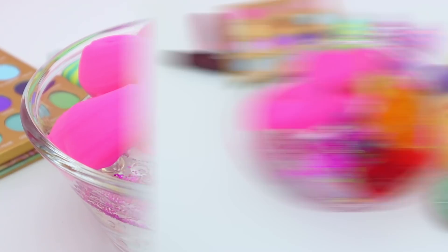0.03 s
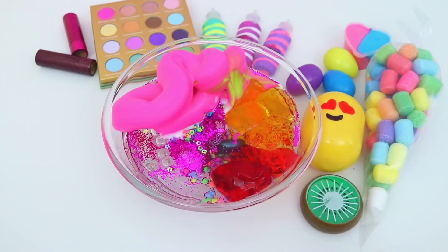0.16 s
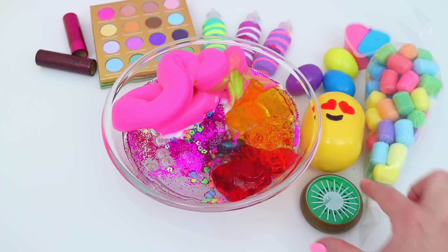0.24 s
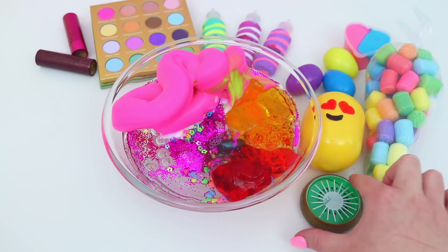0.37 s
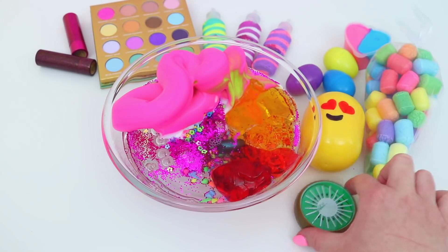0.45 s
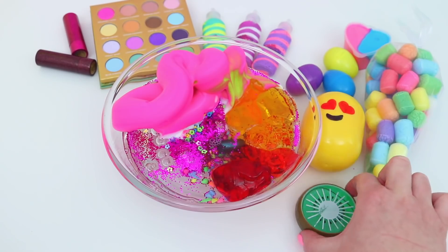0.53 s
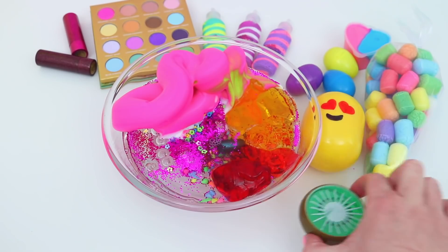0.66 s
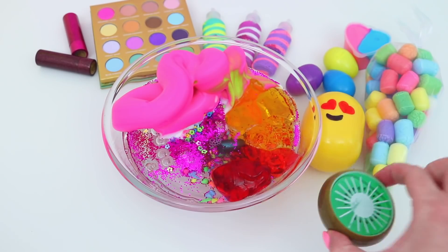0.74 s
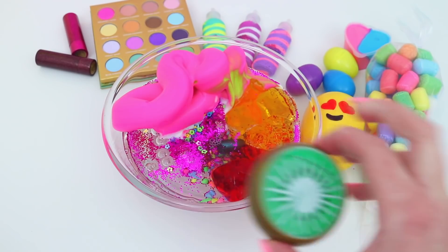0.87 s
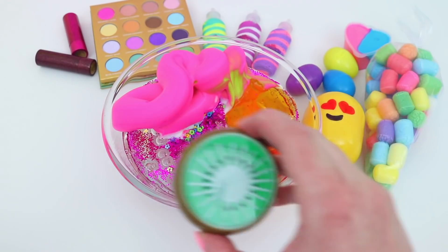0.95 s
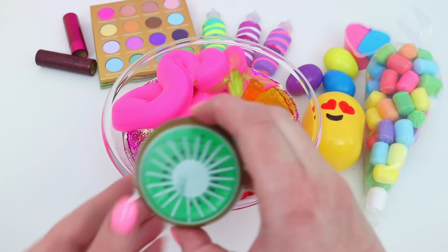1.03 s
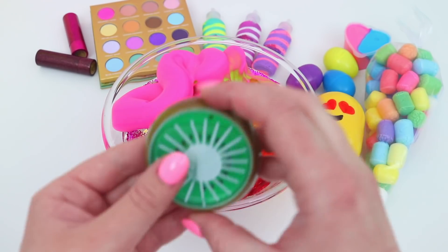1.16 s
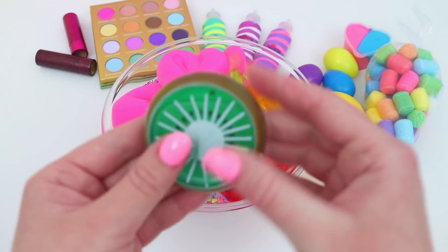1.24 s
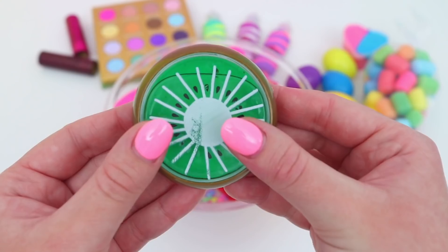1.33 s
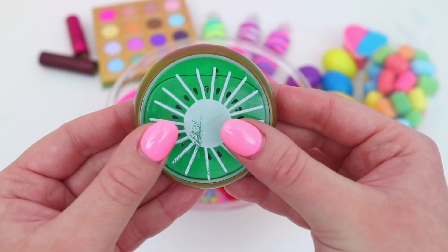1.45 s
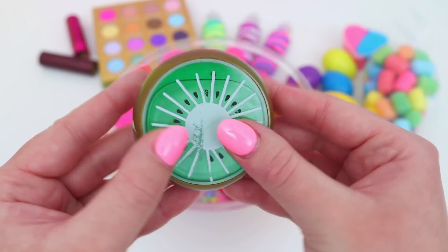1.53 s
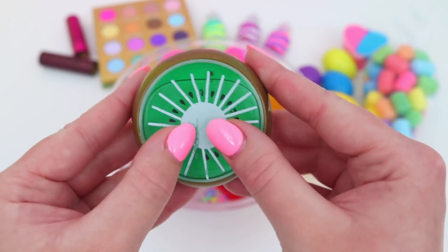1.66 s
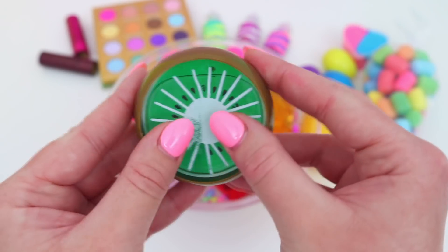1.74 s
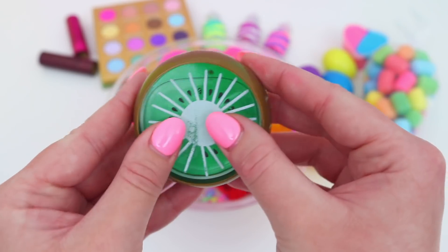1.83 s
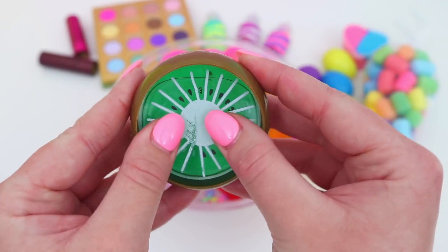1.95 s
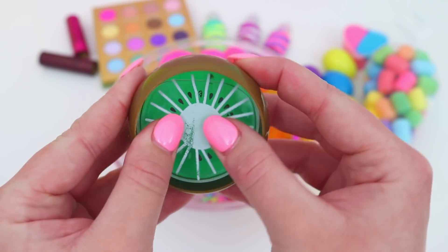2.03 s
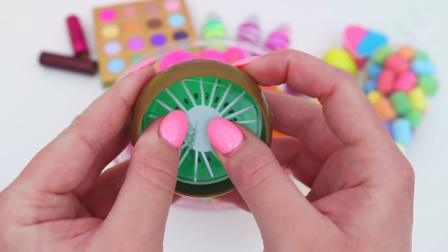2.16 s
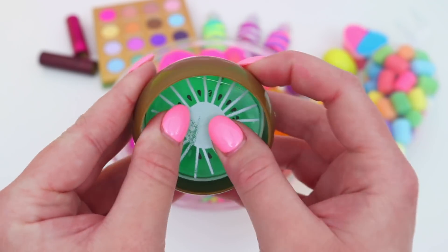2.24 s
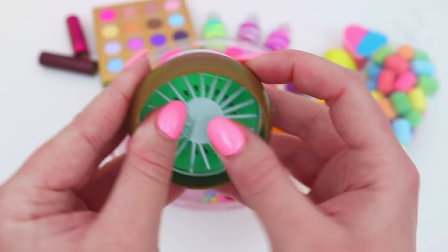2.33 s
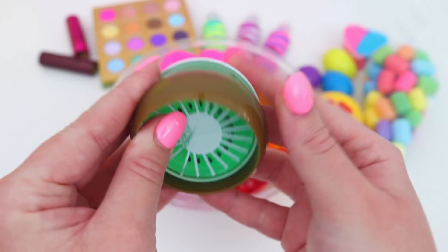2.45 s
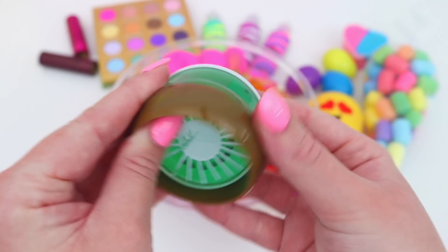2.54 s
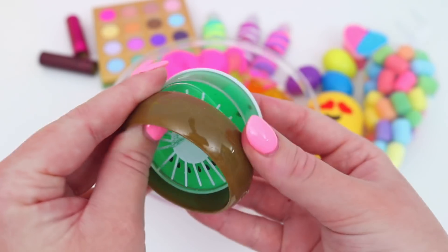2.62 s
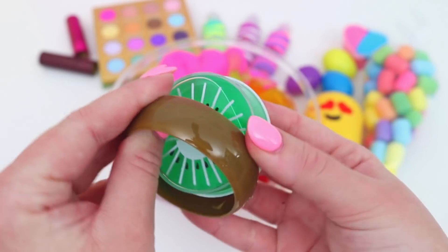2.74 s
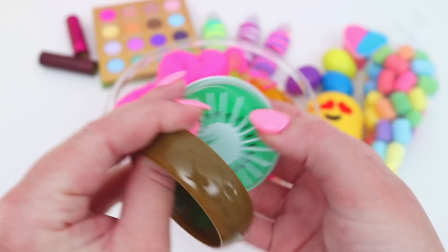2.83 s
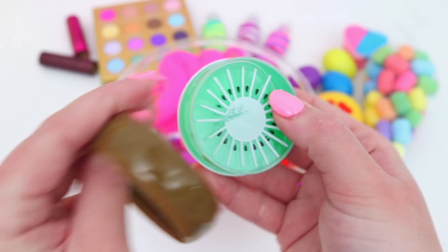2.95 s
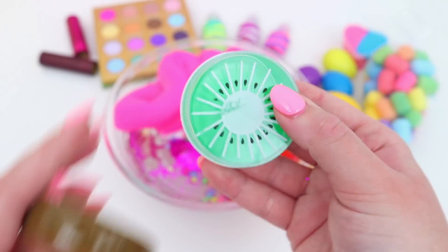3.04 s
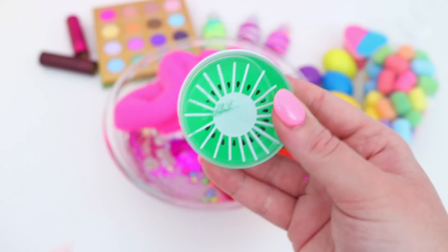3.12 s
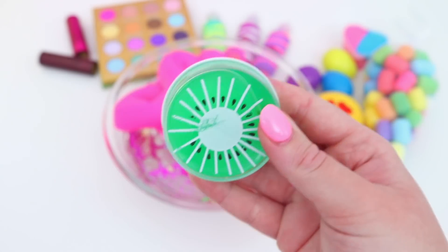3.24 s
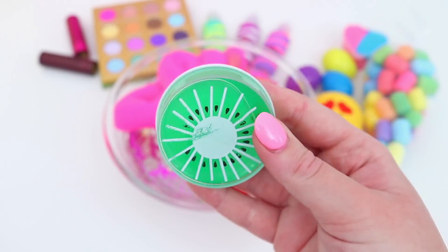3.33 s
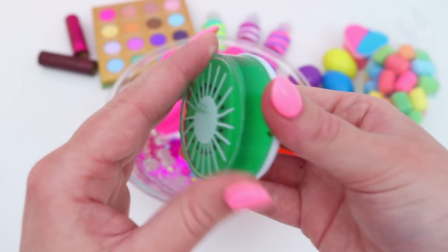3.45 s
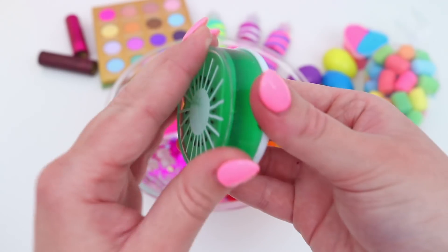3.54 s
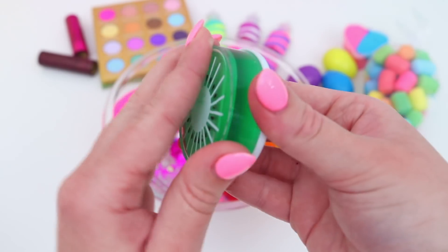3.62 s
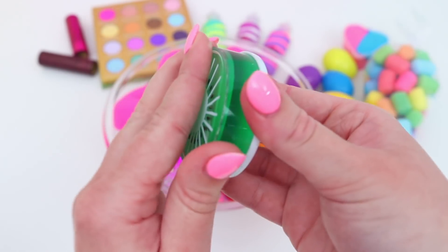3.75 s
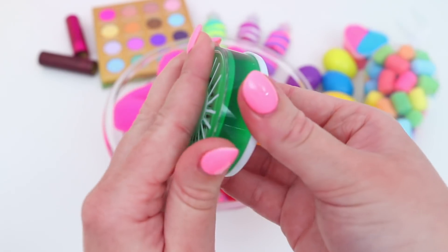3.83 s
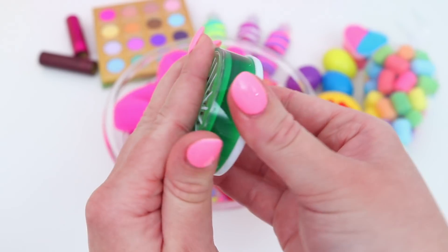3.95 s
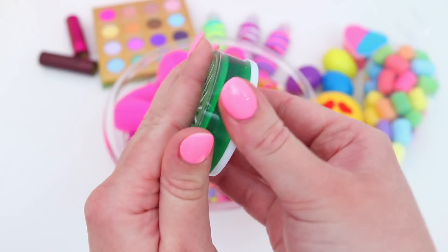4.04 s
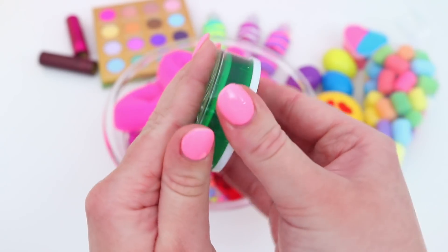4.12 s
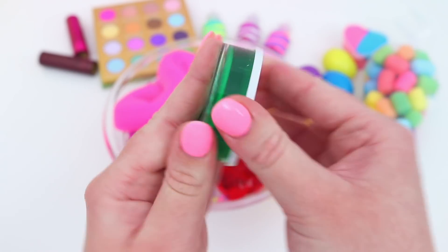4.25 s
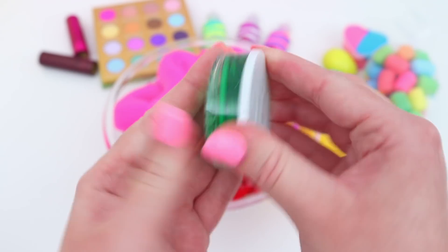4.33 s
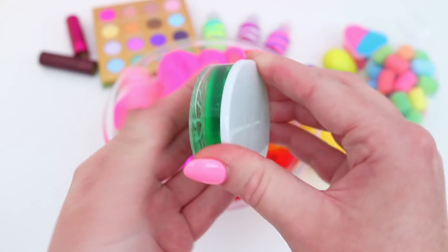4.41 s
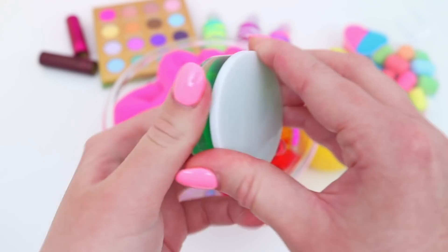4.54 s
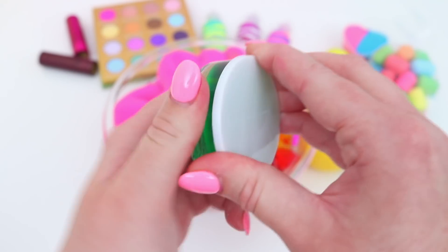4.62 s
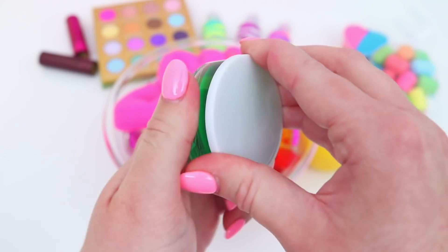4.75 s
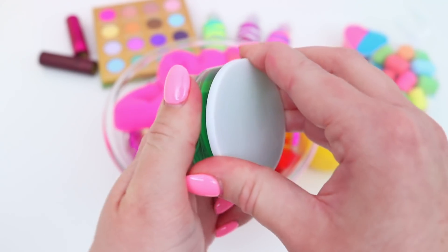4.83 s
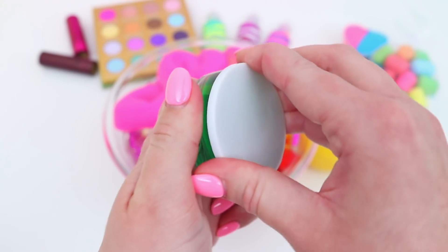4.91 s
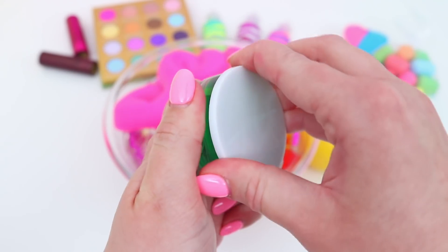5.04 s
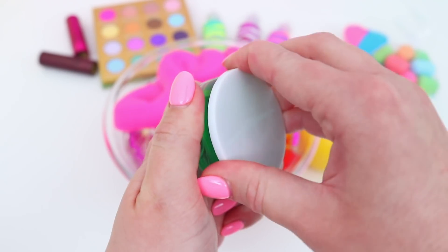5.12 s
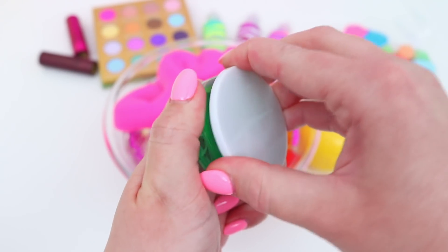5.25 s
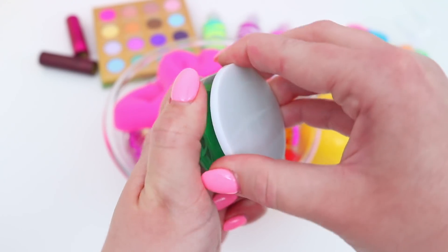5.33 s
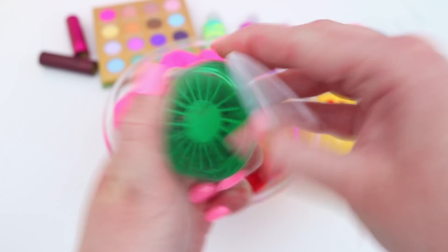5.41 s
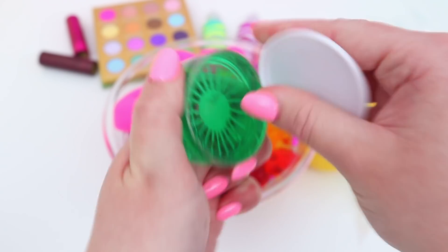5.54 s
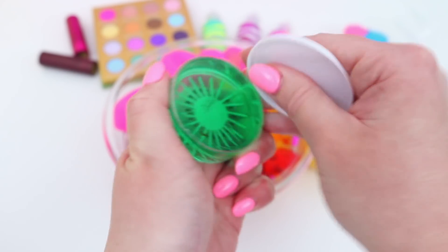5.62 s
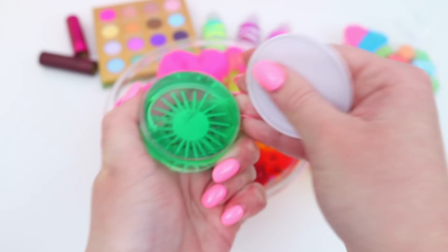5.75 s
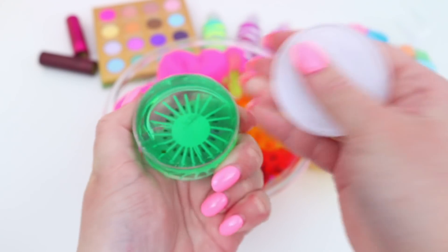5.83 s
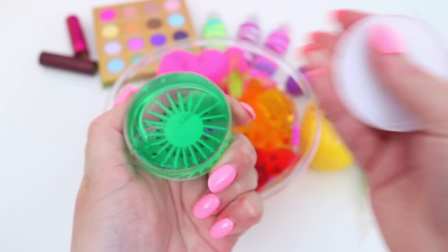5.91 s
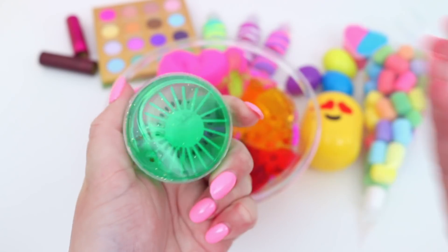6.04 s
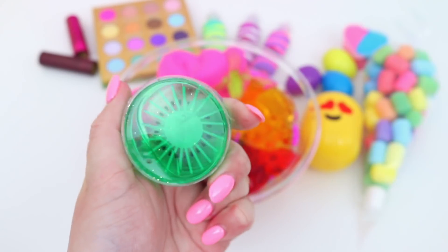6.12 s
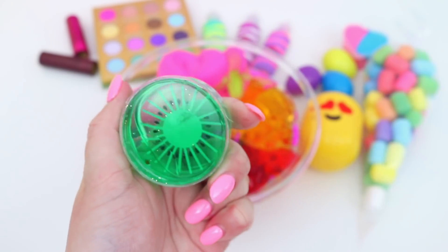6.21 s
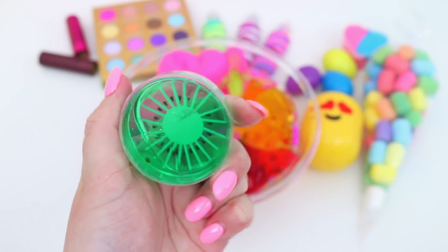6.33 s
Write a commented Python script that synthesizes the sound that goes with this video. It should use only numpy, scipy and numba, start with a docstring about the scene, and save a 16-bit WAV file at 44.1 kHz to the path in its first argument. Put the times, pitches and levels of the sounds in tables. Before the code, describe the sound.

In a quiet room a little plastic container is dragged, squeezed and clicked out of its shell, gently rubbed, then popped open with one sharp crack.

```python
"""A table in a quiet room, with the microphone close: a small plastic tub is dragged off it, pushed out of
its outer shell and turned in the hands until its lid snaps off.
Clicks and stick-slip scrapes ring shell, cavity and thin walls, and at last shake the freed lid.
Gritty slips make the table rattle, the skin rustle and the creaks; filtered noise and tones make the room."""
import sys
import numpy as np
from scipy import signal
from scipy.fft import rfft, irfft
from scipy.io import wavfile
from scipy.ndimage import uniform_filter1d
from numba import njit

SR = 44100
rng = np.random.default_rng(int(sys.argv[2]) if len(sys.argv) > 2 else 0)


def materialize(psi):
    """Save the field psi as 16-bit PCM at rate SR to the path in sys.argv[1].

    A 1-D psi becomes a single channel; in a 2-D psi each row is a channel.
    """
    bounded = np.clip(np.atleast_2d(psi).T, -1, 1)
    quanta = np.round(bounded * 32767).astype(np.int16)
    wavfile.write(sys.argv[1], SR, quanta)


N = 281088
T = np.arange(N) / SR

# clicks of nails and rims: start [t/s], crack drive [level/dB], hollow ring drive [level/dB], crack centre [f/Hz]
CLICKS = [(1.041, -50, -63, 4000), (1.183, -36, -63, 6840), (1.1934, -47, -47.5, 2540),
          (1.5905, -43.5, -58, 7940), (1.6417, -40.5, -50.5, 3900), (1.759, -43, -51, 4100),
          (1.7781, -24.5, -64, 3260), (1.817, -7.5, -32, 5700), (1.8302, -32, -52, 3180),
          (1.938, -31.5, -43, 7100), (2.0164, -47.5, -48, 2220), (2.05, -37.5, -66, 8260),
          (2.0577, -61, -45, 2200), (2.077, -50.5, -37, 4730), (2.0911, -67, -42.5, 2350),
          (2.104, -55, -38.5, 2470), (2.136, -64, -39, 2230), (2.169, -46, -65, 4600),
          (2.1763, -40, -48, 4710), (2.1819, -29.5, -26, 2030), (2.1974, -38, -32, 2420),
          (2.2106, -19.5, -23.5, 2060), (2.22, -39.5, -36, 2440), (2.2474, -57, -40, 2710),
          (2.2892, -45, -34.5, 2300), (2.315, -35, -46.5, 3200), (2.396, -30.5, -44, 5100),
          (2.4905, -9, -36.5, 10840), (2.5277, -45, -46, 4650), (2.567, -36, -41, 3540),
          (2.5934, -33.5, -37.5, 4800), (2.6056, -34, -34, 3250), (2.6453, -34, -44, 5000),
          (2.663, -39, -40, 2620), (2.7094, -35, -34, 2650), (2.818, -53, -27.5, 2210),
          (2.866, -37.5, -29.5, 3410), (2.9179, -21, -31, 4100), (2.9654, -61, -44.5, 2600),
          (3.4846, -61, -55.5, 2590), (4.0663, -50.5, -54, 3760), (4.123, -47, -48.5, 3080),
          (4.14, -41, -47, 3060), (4.152, -41.5, -46.5, 3030), (5.5003, -39.5, -16, 4000),
          (5.513, 7, -39, 4240), (5.549, -18, -24, 2503), (5.5711, -14.5, -30.5, 4230),
          (5.6406, -28, -21, 2550), (5.655, -22, -40, 7000), (5.6695, -40, -34, 2600),
          (5.681, -28, -40, 4000), (6.0106, -69, -49.5, 2724), (6.0855, -54, -41.5, 2690)]
# stick-slip scrapes of rim on rim:
# start [t/s], length [t/ms], hollow ring drive [level/dB], rasp drive [level/dB], rasp centre [f/Hz]
SCRAPES = [(1.63, 28, -78, -58, 5250), (1.771, 12.4, -41.5, -35, 4100), (1.783, 31, -58.5, -49.5, 5530),
           (1.813, 6.4, -42.5, -28.5, 6900), (1.895, 33, -64, -49, 8600), (1.924, 25, -71, -50, 8400),
           (1.949, 28, -48, -46.5, 6800), (2.292, 36, -49, -55, 2680), (2.386, 37.5, -57.5, -47.5, 5760),
           (2.573, 15, -49, -42.5, 5300), (2.609, 26.5, -45, -39, 4750), (2.628, 53, -57.5, -52, 4000),
           (2.715, 21.7, -43.5, -34, 6360), (2.734, 28, -50.5, -47.5, 3860), (2.869, 7.1, -37, -35.5, 5360),
           (2.918, 19.6, -47.5, -49, 3980), (2.955, 25, -47, -52, 5260), (2.985, 21, -55, -52, 6500),
           (5.437, 16.7, -25.5, -28, 4400), (5.454, 13.3, -29, -35, 4320), (5.462, 14, -33, -26.5, 6500),
           (5.474, 15.6, -36.5, -32.5, 3500), (5.4919, 10, -34, -11, 6000), (5.501, 11.6, -30.5, -26, 4000),
           (5.5129, 8, -24, -7.5, 2370), (5.524, 47, -37.5, -39, 3232)]
# modes of the outer shell: pitch [f/Hz], relative level [level/dB], 60 dB decay [t/s]
SHELL = [(647, 4, 0.015), (433, -11, 0.018), (1710, -2, 0.014), (910, -0.5, 0.01)]
# modes of the tub's hollow: pitch [f/Hz], relative level [level/dB], 60 dB decay [t/s]
CAVITY = [(1443.5, -1, 0.025), (2634, -25, 0.032)]


def undb(db):
    """Decibels to linear gain."""
    return 10 ** (np.asarray(db) / 20)


def unit(x):
    """Scale to rms 1."""
    return x / np.sqrt(np.mean(x ** 2))


@njit
def svf(x, hz, k):
    """State-variable band-pass whose centre may move; k = width / centre."""
    y, b, l = np.empty(len(x)), 0., 0.
    for i in range(len(x)):
        g = np.tan(np.pi * hz[i] / SR)
        v = (b + g * (x[i] - l)) / (1 + g * (g + k))
        b, l, y[i] = 2 * v - b, l + 2 * g * v, k * v
    return y


def band(x, hz, width_hz):
    """Band-pass with a fixed centre."""
    return svf(x, np.full(N, 1. * hz), width_hz / hz)


def ring(modes, stretch=1, spread_db=0):
    """Response of decaying modes to one tap."""
    t = T[:SR // 5]
    spread_db = spread_db + np.zeros(len(modes))
    out = np.zeros(len(t))
    for (hz, db, t60_s), more_db in zip(modes, spread_db):
        out += undb(db + more_db - 60 * t / t60_s) * np.sin(2 * np.pi * hz * stretch * t)
    return out


def shiver(hz, width_hz, t60_s):
    """Response of very many close modes: noise that dies away; energy 1."""
    tail = band(rng.standard_normal(N), hz, width_hz) * undb(-60 * T / t60_s)
    tail = tail[:SR // 2]
    return tail / np.linalg.norm(tail)


def grit(scatter_db, smear_s):
    """Dense slips of very uneven size; rms 1."""
    smooth = uniform_filter1d(rng.exponential(size=N), int(smear_s * SR) + 1)
    size = undb(scatter_db * smooth * np.sqrt(smear_s * SR))  # the root undoes the loss of scatter in smoothing
    size = np.minimum(size / np.median(size), 30)
    return unit(size * rng.standard_normal(N))


def swells(rows, power):
    """Gain of (start [t/s], length [t/s], level [dB]) gestures that each rise and fall."""
    gain = np.zeros(N)
    for s, length_s, db in np.atleast_2d(rows):
        arch = np.sin(np.pi * np.clip((T - s) / length_s, 0, 1))
        gain += undb(db) * np.maximum(arch, 0) ** power
    return gain


def walls(x, ring_db):
    """Thin walls add their resonances to a broad sound."""
    # wall resonances: centre [f/Hz], width [f/Hz], relative level [level/dB]
    wall_modes = [(2336, 500, 3), (3000, 200, -12), (3630, 170, -1.5), (4795, 67, -11.5), (5780, 590, -4),
                  (7450, 53, -15.5), (7990, 230, 2), (10800, 110, -1), (13400, 280, -5), (13800, 580, -2)]
    resonances = np.zeros(N)
    for k, (hz, width_hz, db) in enumerate(wall_modes):
        resonances += (-1) ** k * undb(db) * band(x, hz, width_hz)  # neighbours alternate in sign
    return x + undb(ring_db) * resonances


def air():
    """Microphone hiss, low room rumble and a few wavering appliance tones."""
    # spectrum of hiss and rumble: [f/Hz], relative density [level/dB per Hz]
    hiss_curve = [(15, -45), (25, -19.5), (70, -0.5), (97, -5.5), (127, -3.5), (217, -10.5), (249, -8),
                  (384, -16.5), (427, -17.5), (489, -16.5), (1520, -24), (3620, -26.5), (16000, -29)]
    # appliance tones: pitch [f/Hz], level of the steady tone [level/dB rms]
    tone_rows = [(70.0, -72.5), (209.9, -77.5), (317.6, -85.5), (387.6, -76.5)]
    f = np.fft.rfftfreq(N, 1 / SR) + 1  # 1 Hz up, to keep the logarithm finite
    hz, db = np.transpose(hiss_curve)
    colour = undb(np.interp(np.log(f), np.log(hz), db))
    hiss = unit(irfft(rfft(rng.standard_normal(N)) * colour, N))
    tones = np.zeros(N)
    for hz, db in tone_rows:
        steady = np.sqrt(2) * np.sin(2 * np.pi * hz * T)
        waver = .5 * unit(band(rng.standard_normal(N), hz, 11))
        tones += undb(db) * (steady + waver)
    return undb(-66.5) * hiss + tones


def room(x, wet_db, t60_s):
    """Diffuse echoes, dull because the treble is soaked up."""
    echoes = signal.fftconvolve(x, shiver(1500, 3000, t60_s))[:N]
    return undb(wet_db) * np.roll(echoes, int(0.0055 * SR))  # echoes start 5.5 ms late


def table():
    """The table top rattles under the dragged tub; dull thuds come from it and later from the hands' jerks."""
    # resonances of the table top: centre [f/Hz], width before widening [f/Hz], relative level [level/dB]
    top_modes = [(321, 61, 22.5), (438, 63, 27), (854, 267, 20), (1320, 460, 10)]
    # thuds of the tub on the table, later of the hands' jerks: start [t/s], drive [level/dB], pitch [f/Hz]
    thuds = [(0.147, -41.5, 205), (0.503, -33.5, 400), (0.51, -39, 400), (0.577, -27, 440),
             (0.61, -34, 393), (0.643, -35, 427), (5.113, -44.5, 109), (5.443, -32, 118),
             (5.512, -26.5, 95.7), (5.516, -23, 220)]
    jolt_s, rise_s, lift_s = .528, 0.0082, 0.665  # the tub jerks loose, slides and leaves the table
    jolt_db, jolt_db_per_s = -35.5, 702
    slide_db, slide_db_per_s = -45.5, 60
    sand_db, sand_db_per_s, lift_db_per_s = -42, 295, 250

    slips = grit(scatter_db=2.5, smear_s=0.00075)
    top = np.zeros(N)
    for hz, width_hz, db in top_modes:
        wide_hz = 1.9 * width_hz  # each of the two passes is wider
        top += undb(db) * band(band(slips, hz, wide_hz), hz, wide_hz)
    top = unit(top)
    sand = unit(band(band(slips, 2100, 3000), 2100, 3000))

    after_s = np.maximum(T - jolt_s, 0)
    onset = np.exp(-(np.minimum(T - jolt_s, 0) / rise_s) ** 2)
    touch = onset * undb(-lift_db_per_s * np.maximum(T - lift_s, 0))
    rattle = undb(jolt_db - jolt_db_per_s * after_s) + undb(slide_db - slide_db_per_s * after_s)
    out = touch * (rattle * top + undb(sand_db - sand_db_per_s * after_s) * sand)
    for s, db, hz in thuds:
        # a soft contact, about a cycle long
        thud = ring([(hz, db, 9 / hz)]) * (1 - np.exp(-T[:SR // 5] * hz * 3.6))
        i = int(s * SR)
        out[i:i + len(thud)] += thud
    return signal.sosfilt(signal.butter(2, 70, "highpass", fs=SR, output="sos"), out)


def fingers():
    """Skin scuffs over the walls in patches and makes the cavity hum faintly; the hands rumble."""
    # strokes over the plastic: start [t/s], length [t/s], rustle [level/dB], bright minus low rustle [level/dB]
    strokes = [(1.048, 0.13, -73.5, -27), (1.355, 0.22, -75.5, -1), (1.584, 0.068, -68, 0),
               (1.679, 0.093, -68.5, -1.5), (3.021, 0.12, -67.5, 6), (3.137, 0.11, -67.5, 1.5),
               (3.232, 0.086, -68, -35), (3.323, 0.046, -63, -1.5), (3.368, 0.077, -68.5, -20),
               (4.09, 0.08, -72, -4), (4.157, 0.091, -66, 0), (4.326, 0.11, -76.5, 7.5),
               (4.7, 0.29, -79, -2), (5.784, 0.068, -70.5, -4), (5.865, 0.071, -70.5, -8),
               (6.091, 0.32, -76, -6.5)]
    # hums of the cavity as skin drags on its rim: start [t/s], length [t/s], [level/dB]
    hums = [(1.2, .07, -73), (1.6, 0.045, -71), (3.46, 0.054, -69.5), (4.33, 0.14, -70.5),
            (4.55, 0.026, -72), (4.68, 0.065, -73), (4.79, 0.069, -68), (4.9, 0.1, -74),
            (5.02, 0.053, -74.5), (5.23, 0.14, -76), (5.8, 0.051, -70), (6.0, 0.041, -68),
            (6.09, 0.049, -68)]
    # rumble while the hands work near the microphone: start [t/s], length [t/s], [level/dB]
    hands = (1.4, 2.2, -64)
    patches = [undb(2.5 * unit(band(rng.standard_normal(N), 16, 32))) for _ in range(3)]
    slips = [unit(p * grit(scatter_db=1.0, smear_s=0.0011)) for p in patches]

    low = unit(walls(band(slips[0], 1700, 6900), ring_db=4.0))
    high = unit(walls(band(band(slips[1], 9700, 9800), 9700, 9800), ring_db=0.5))
    hum = unit(band(slips[2], CAVITY[0][0], 45) + 0.28 * band(slips[2], CAVITY[1][0], 150))
    rumble = unit(band(band(rng.standard_normal(N), 71, 150), 71, 150))

    low_rows = [(s, length_s, db) for s, length_s, db, _ in strokes]
    high_rows = [(s, length_s, db + more_db) for s, length_s, db, more_db in strokes]
    rustle = swells(low_rows, power=0.2) * low + swells(high_rows, power=0.22) * high
    return rustle + swells(hums, power=0.47) * hum + swells(hands, power=0.47) * rumble


def creak():
    """Thumb pushes make dense tiny slips between tub and shell."""
    # thumb pushes: start [t/s], length [t/s], [level/dB]
    pushes = [(1.75, 0.34, -66.5), (2.0, 0.39, -62.5), (2.5, 0.56, -61.5), (3.03, 0.58, -69)]
    slips = grit(scatter_db=3.0, smear_s=.001)
    shell = signal.fftconvolve(slips, ring(SHELL))[:N]
    groan = unit(band(shell, 1200, 1600))
    fizz = unit(band(slips, 3400, 12000))
    return swells(pushes, power=0.7) * unit(groan + 0.84 * fizz)


def hollow(s, db):
    """Levels of shell and cavity for a contact at time s: the grip damps one of the two."""
    # which hollow part rings, as thumbs damp the tub or the shell: [t/s], cavity minus shell [level/dB]
    grip_lean = [(1.2, 33), (1.68, 15), (1.75, -0.5), (1.94, -11), (2.14, -22), (2.33, -5), (2.38, 13),
                 (2.6, 9), (2.606, -2.5), (2.64, 3), (2.71, 9), (2.73, -5), (2.81, 14), (2.88, 12),
                 (2.92, 28), (2.96, 4), (4.13, 0.5), (5.44, 18), (5.47, 6), (5.5, 11.5), (5.53, 8.5),
                 (5.64, 14.5), (6.1, 9)]
    lean_db = np.interp(s, *np.transpose(grip_lean))
    return db - max(lean_db, 0), db + min(lean_db, 0)


def scrapes():
    """Stick-slip bursts ring shell and cavity and rasp; returns (hollow ring, rasp)."""
    shell, cavity, rasp = np.zeros(N), np.zeros(N), np.zeros(N)
    h_shell, h_cavity = ring(SHELL), ring(CAVITY)
    slips = grit(scatter_db=-1.5, smear_s=0.00013)
    for s, ms, ring_db, rasp_db, _ in SCRAPES:
        shell_db, cavity_db = hollow(s, ring_db)
        i, n = int(s * SR), int(ms * SR / 1000)
        # the grip builds, slips and lets go
        push = slips[i:i + n] * np.sin(np.pi * np.linspace(0, 1, n)) ** 0.68
        shell[i:i + n] += push * undb(shell_db) / np.linalg.norm(h_shell)
        cavity[i:i + n] += push * undb(cavity_db) / np.linalg.norm(h_cavity)
        rasp[i:i + n] += push * undb(rasp_db)
    ringing = signal.fftconvolve(shell, h_shell)[:N] + signal.fftconvolve(cavity, h_cavity)[:N]
    return ringing, rasp


def clicks():
    """Short contacts knock the hollow parts and crack; returns (knocks, cracks)."""
    contact_s = .0004  # a fingertip's push takes this long to build
    knocks, cracks = np.zeros(N), np.zeros(N)
    t = T[:SR // 40]
    bursts = rng.standard_normal((len(CLICKS), len(t)))
    grips = rng.standard_normal((len(CLICKS), 9))
    for (s, crack_db, ring_db, hz), burst, grip in zip(CLICKS, bursts, grips):
        shell_db, cavity_db = hollow(s, ring_db)
        i = int(s * SR)
        # every grip bends the shell differently, which shifts and reweights its modes
        knock = undb(shell_db) * ring(SHELL, 1 + .1 * grip[0], 3.0 * grip[1:5])
        knock += undb(cavity_db) * ring(CAVITY, 1 + 0.01 * grip[5], 2.4 * grip[6:8])
        knocks[i:i + len(knock)] += knock * (1 - np.exp(-T[:len(knock)] / contact_s))
        # a crack lasts a few cycles of its own pitch, then fizzles
        fade = np.exp(-t * hz / 4.3) + 0.073 * np.exp(-t / 0.0061)
        cracks[i:i + len(t)] += burst * undb(crack_db) * fade
    return knocks, cracks


def contact_centre():
    """Band centre in Hz over time: each contact keeps its colour until the next one."""
    starts = np.array(sorted((row[0], row[-1]) for row in CLICKS + SCRAPES))
    latest = np.maximum(np.searchsorted(starts[:, 0], T + 1 / SR) - 1, 0)
    return np.minimum(starts[latest, 1], .3 * SR)


def tub():
    """Clicks and scrapes drive the shell, the cavity, the walls and at last the freed lid."""
    # the freed lid shivers in many close modes: centre [f/Hz], width [f/Hz], 60 dB decay [t/s], [level/dB]
    lid_modes = (2350.5, 1802.5, 0.2548, -17)
    lid_free_s = 5.51
    ringing, rasp = scrapes()
    knocks, cracks = clicks()

    centre = contact_centre()
    coloured = svf(svf(cracks + rasp, centre, 1.5), centre, 1.5)
    bright = walls(coloured, ring_db=-2.0)
    lid = signal.fftconvolve(bright * (T > lid_free_s), shiver(*lid_modes[:3]))[:N]
    # soft contacts round the attack; the knocks and ringing are kept between about 280 Hz and 4 kHz
    body_band = signal.butter(2, [280, 4000], "bandpass", fs=SR, output="sos")
    body = signal.sosfilt(body_band, knocks + ringing)
    return bright + undb(lid_modes[3]) * lid + body


def scene():
    """The sources near the microphone, their echoes and the air of the room."""
    near = tub() + creak() + fingers() + table()
    return (near + room(near, wet_db=-22.5, t60_s=0.32) + air())[None]


def record(dry):
    """The recorder rounds the loudest peaks and cuts the top above 16 kHz."""
    rounded = .9 * np.tanh(dry / .9)
    return signal.sosfilt(signal.ellip(10, .2, 90, 16000, fs=SR, output="sos"), rounded)


dry = scene()
out = record(dry)
materialize(out)
```